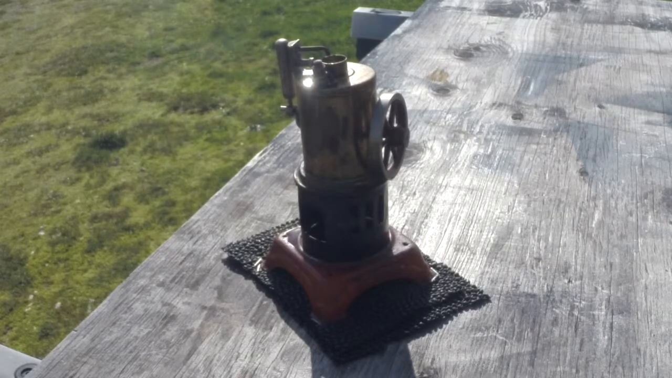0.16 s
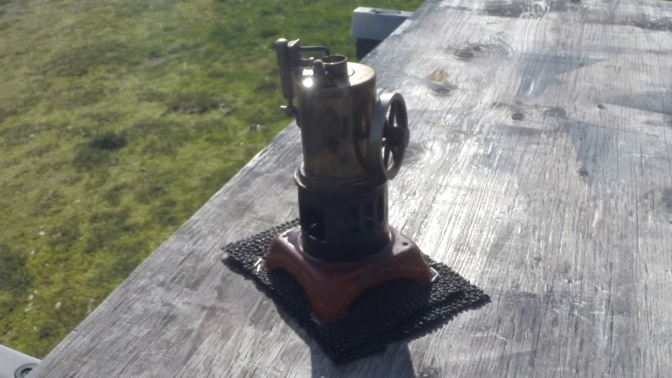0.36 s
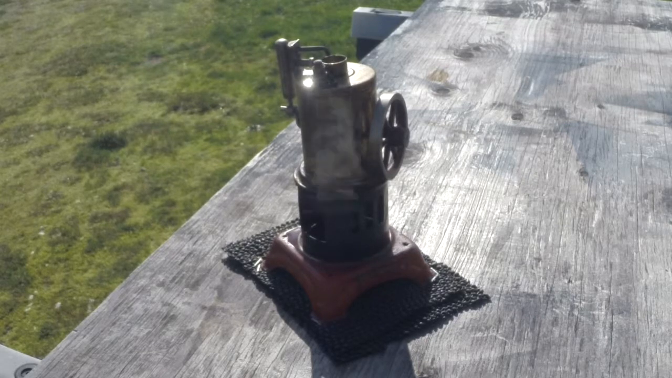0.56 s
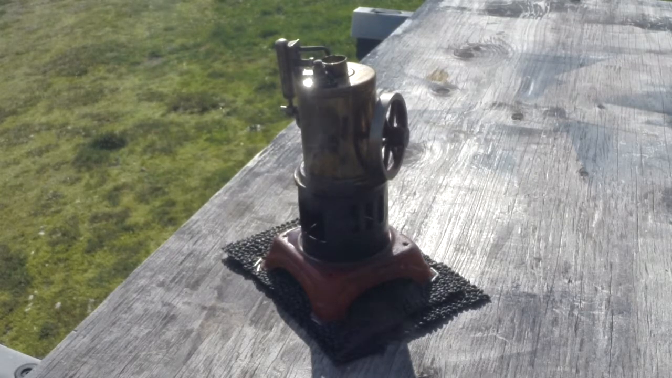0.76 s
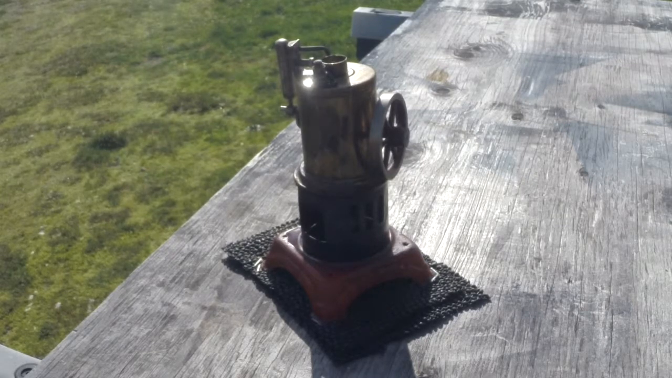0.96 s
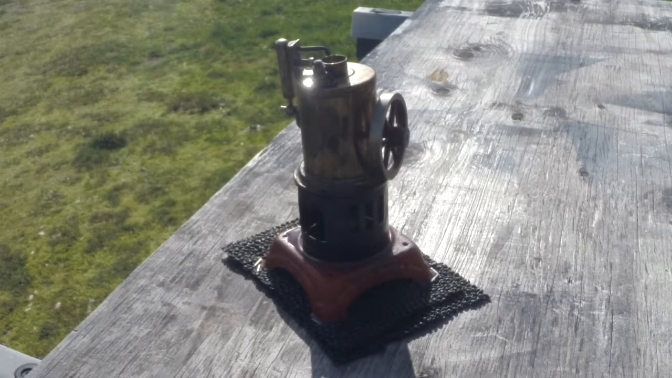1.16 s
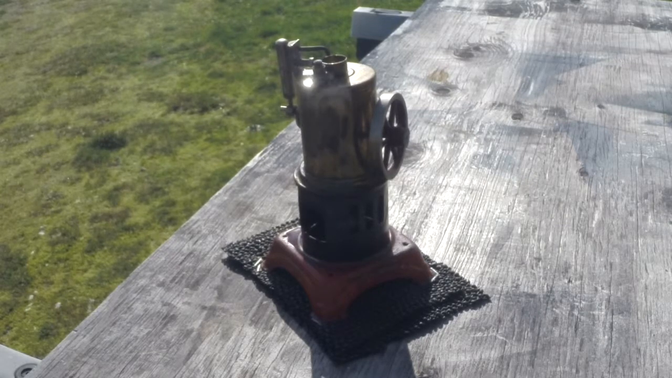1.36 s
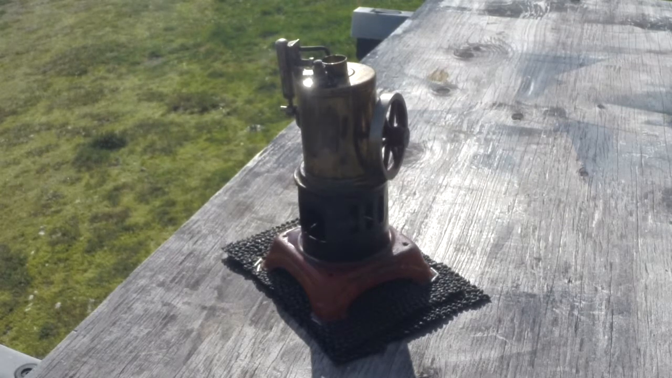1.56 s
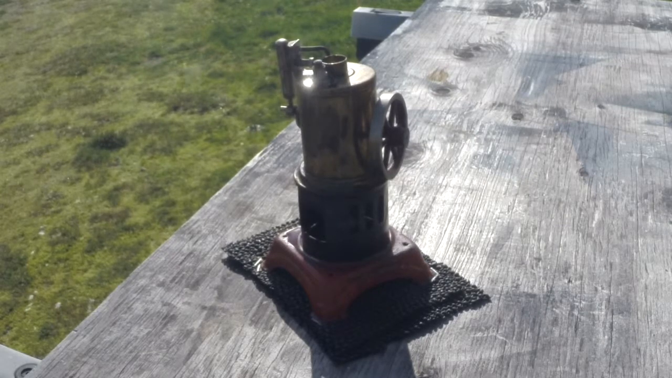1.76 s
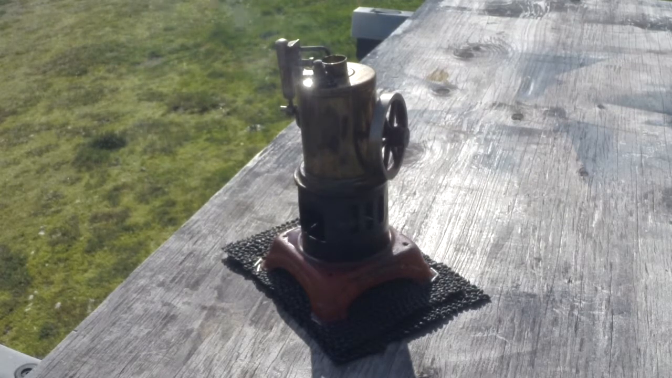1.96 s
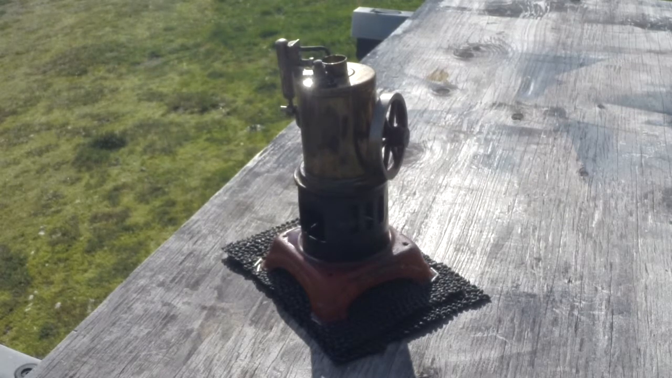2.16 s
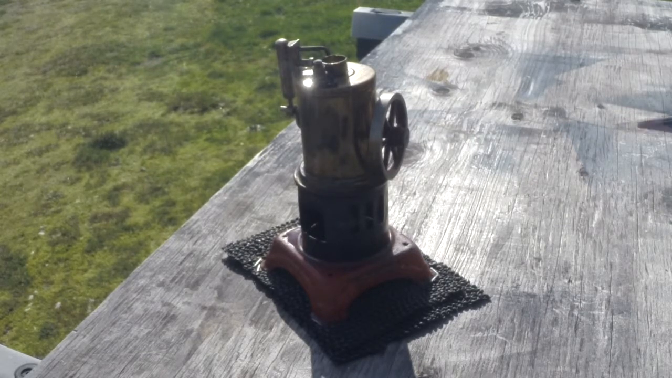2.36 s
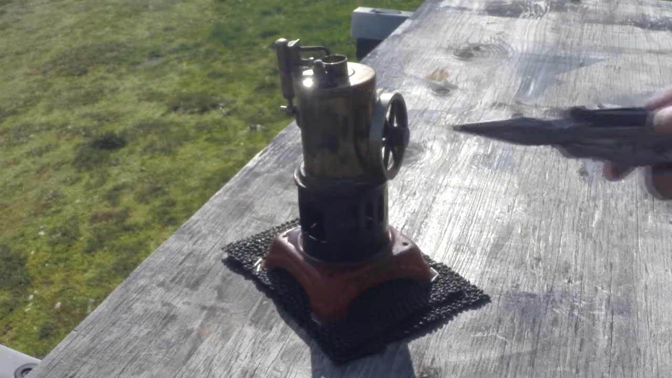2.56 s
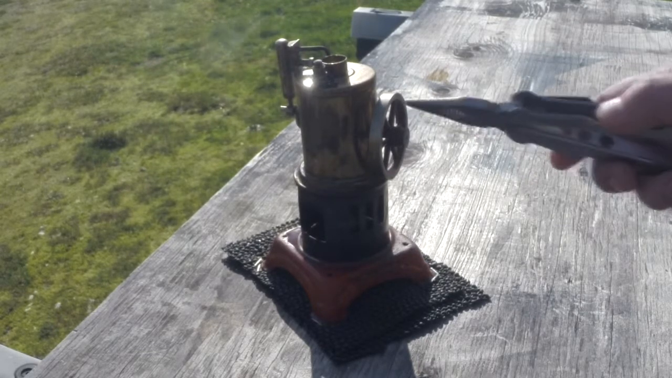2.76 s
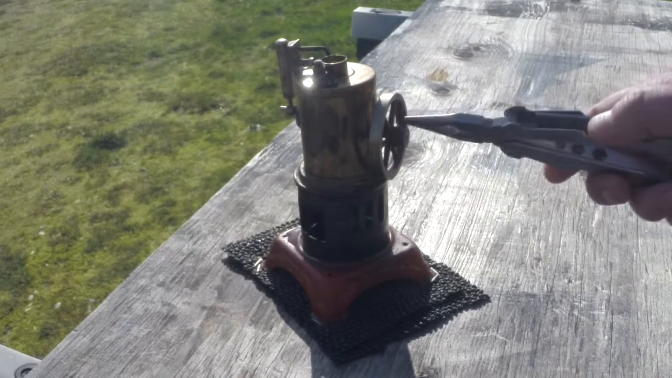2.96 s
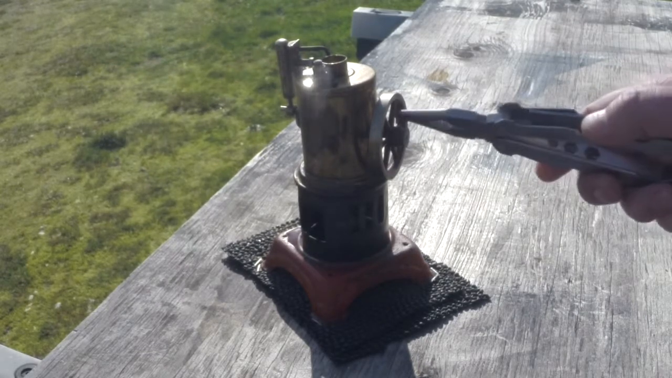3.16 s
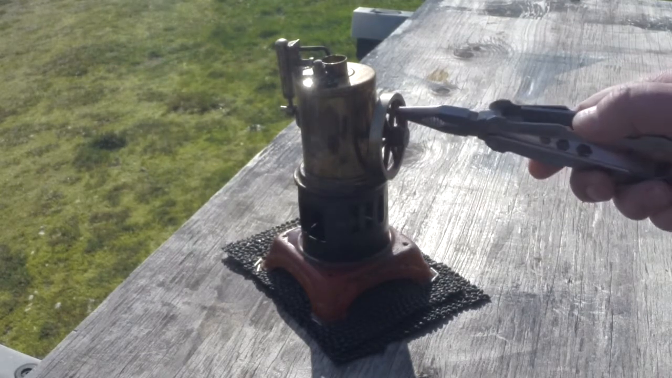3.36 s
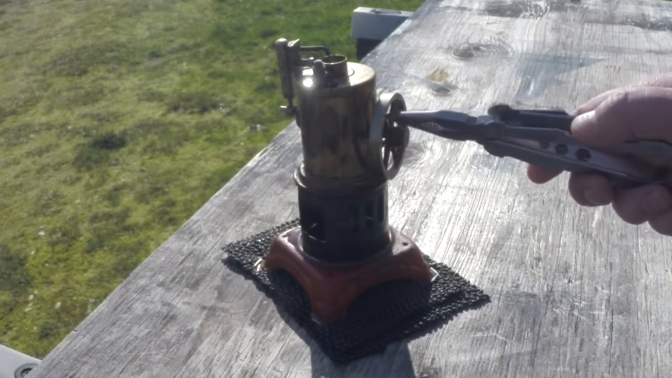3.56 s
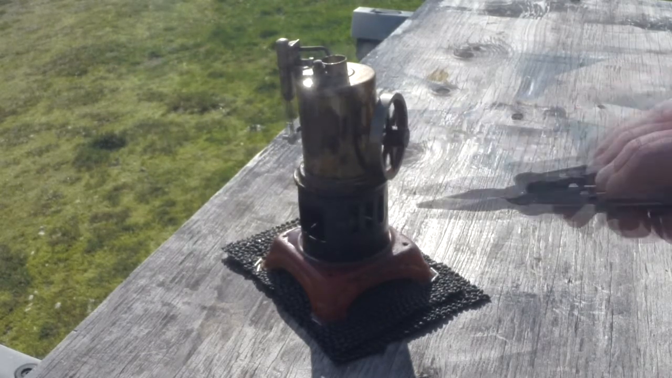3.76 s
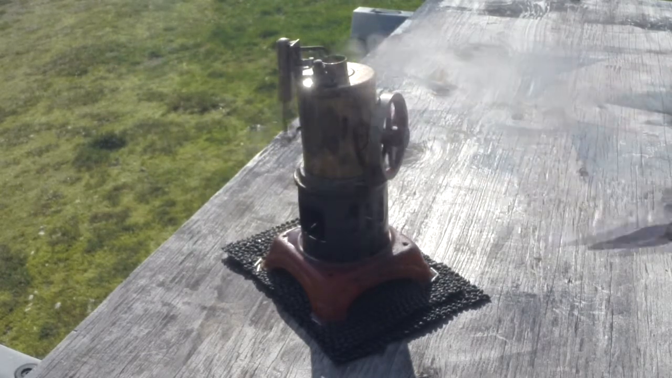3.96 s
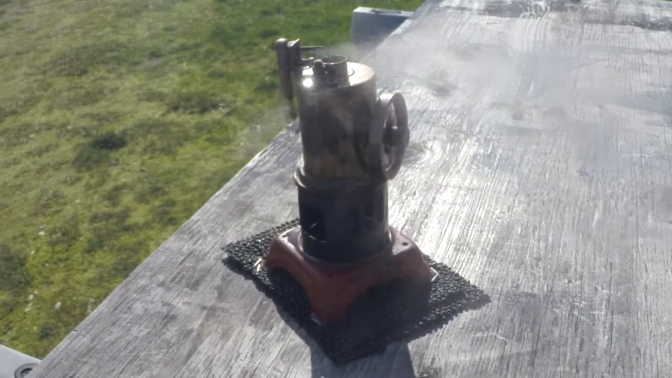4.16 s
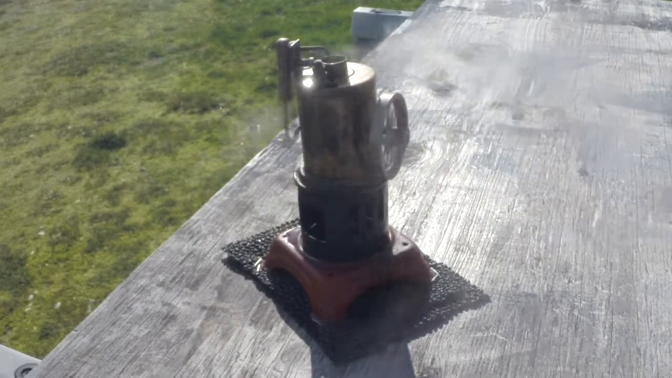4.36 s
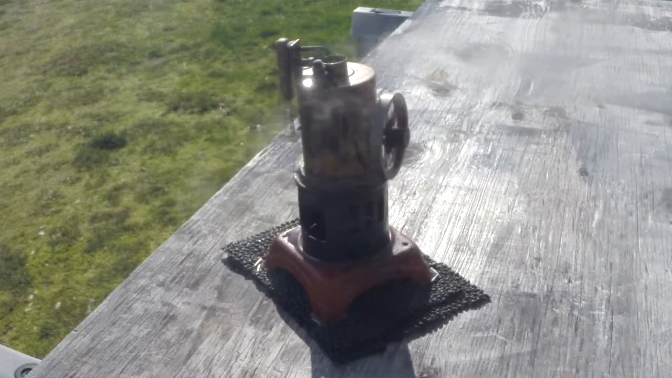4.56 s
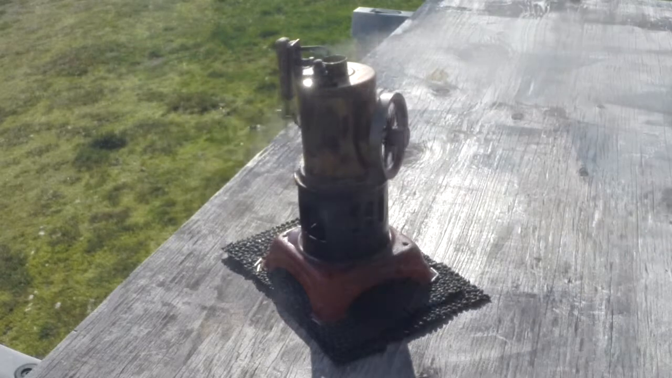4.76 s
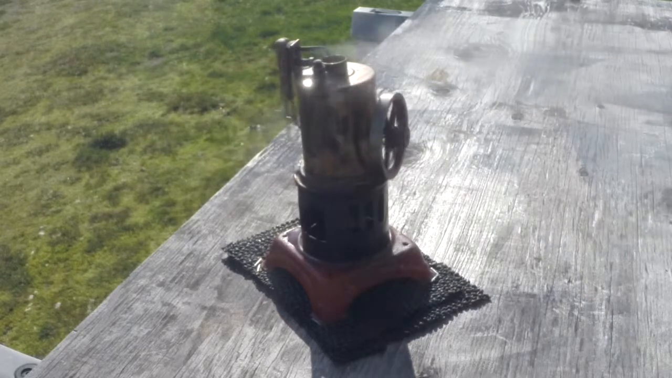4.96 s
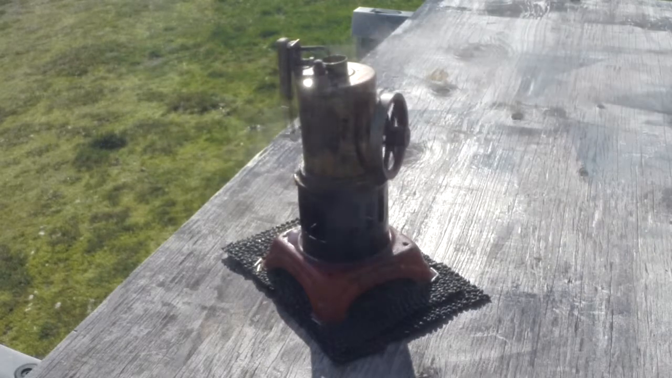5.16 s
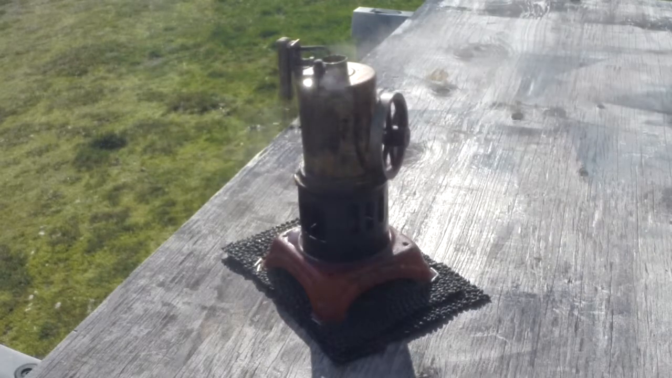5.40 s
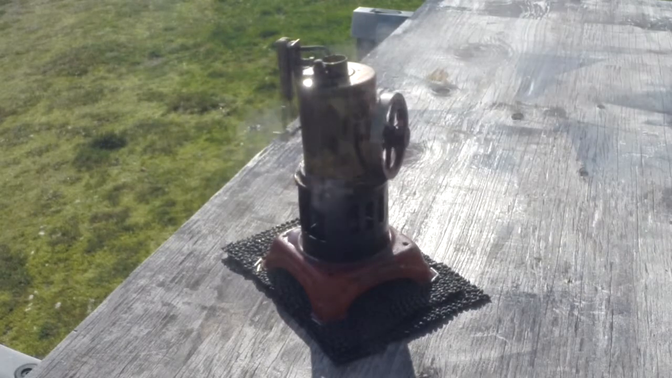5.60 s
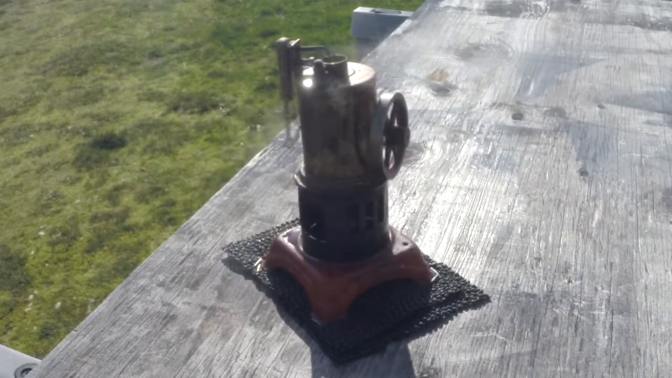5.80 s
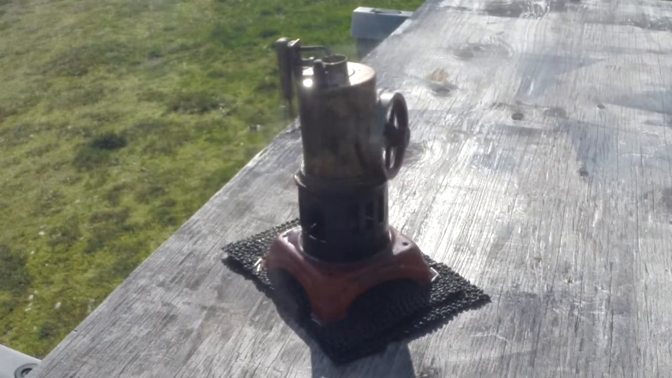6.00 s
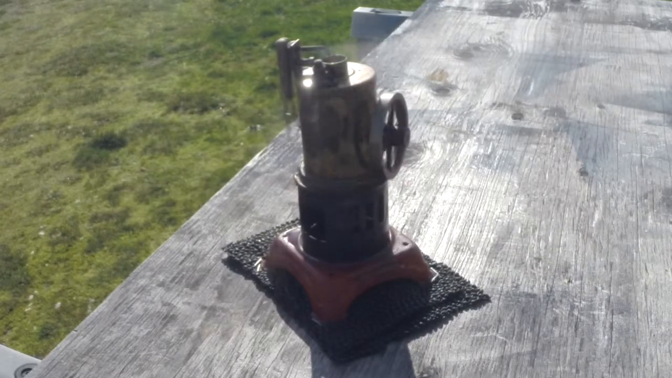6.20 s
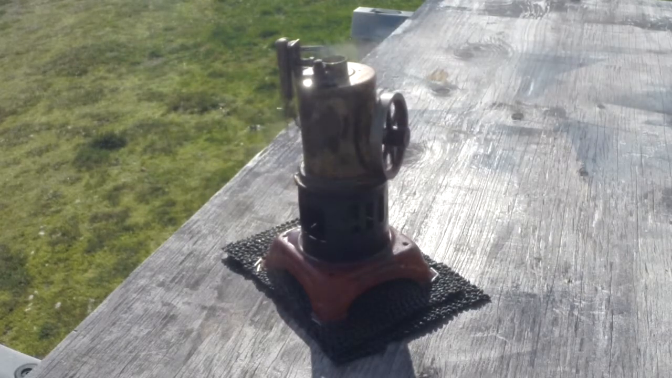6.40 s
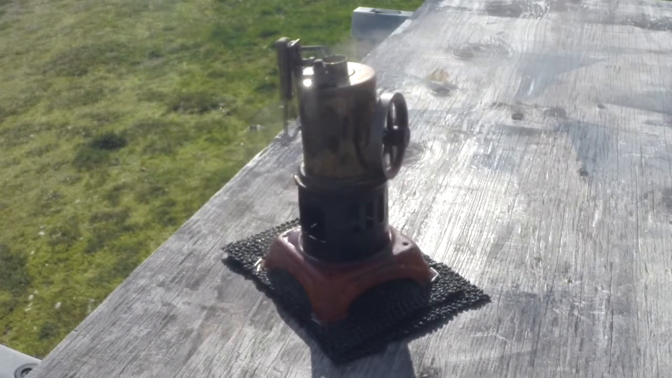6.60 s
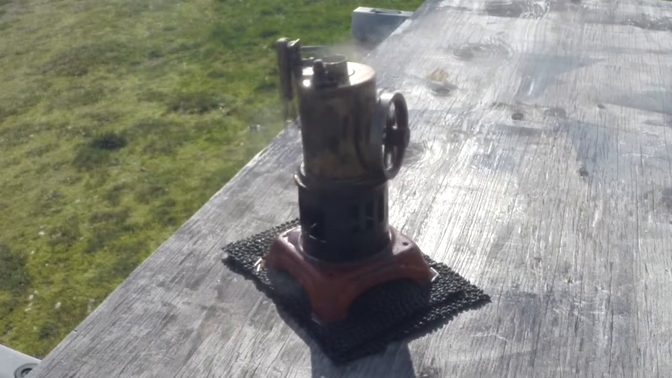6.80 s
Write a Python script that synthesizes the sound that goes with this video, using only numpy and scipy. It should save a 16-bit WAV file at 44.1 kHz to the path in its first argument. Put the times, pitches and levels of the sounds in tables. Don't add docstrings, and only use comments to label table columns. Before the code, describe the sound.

Quiet boiler hiss, droplet ticks and bubbling pops give way to metallic clacks and fast accelerating steam puffs from a toy engine on a table.

```python
import sys
import numpy as np
from scipy import signal
from scipy.fft import rfft, irfft
from scipy.io import wavfile

SR = 44100
rng = np.random.default_rng(int(sys.argv[2]) if len(sys.argv) > 2 else 0)


def level_to_linear(level):
    exponent = np.asarray(level, float) / 20
    return 10 ** exponent


def dump(signal):
    limited = np.clip(np.atleast_2d(signal).T, -1, 1)
    pcm = np.round(limited * 32767).astype(np.int16)
    wavfile.write(sys.argv[1], SR, pcm)


N = 301644
t = np.arange(N) / SR


def in_time(rows):
    s, *columns = np.transpose(rows)
    return [np.interp(t, s, c) for c in columns]


def at_hz(points):
    hz, value = np.transpose(points)
    return np.interp(np.log(np.fft.rfftfreq(N, 1 / SR) + 1), np.log(hz), value)


def colour(x, points):
    gain = level_to_linear(at_hz(points))
    return irfft(rfft(x) * gain / np.sqrt(np.mean(gain ** 2)), N)


def drift(rate):
    r = np.exp(-80 * np.pi * rate / SR)
    slow = signal.lfilter([1], [1, -2 * r, r * r], rng.standard_normal(N // 40 + 2002))[2000:]
    return np.interp(np.arange(N) / 40, np.arange(len(slow)), slow / slow.std())


def band(x, low_hz, high_hz):
    sos = signal.butter(2, [low_hz, min(high_hz, .45 * SR)], "band", fs=SR, output="sos")
    return signal.sosfilt(sos, x) * np.sqrt(SR / 2 / (high_hz - low_hz))


def part(x, order, corner_hz, side="low"):
    return signal.sosfiltfilt(signal.butter(order, corner_hz, side, fs=SR, output="sos"), x)


def resonance(x, hz, width):
    r = np.exp(-np.pi * width / SR)
    poles = [1, -2 * r * np.cos(2 * np.pi * hz / SR), r * r]
    return signal.lfilter([(1 - r * r) / 2, 0, (r * r - 1) / 2], poles, x + 1e-18)


def click(s, db):
    out = np.zeros(N)
    out[int(s * SR)] = level_to_linear(db)
    return out


def bursts(times, db, decay_ms, same=0.):
    out = np.zeros(N + 2000)
    noise = rng.standard_normal((len(times) + 1, 2000))
    same = np.clip(same, 0, 1)
    for s, level_db, ms, row in zip(times, db, np.broadcast_to(decay_ms, len(times)), noise[1:]):
        i = min(int(s * SR), N)
        fall = np.exp(-np.arange(2000) / (SR * max(ms, .1) / 1000))
        blow = (same * noise[0] + np.sqrt(1 - same ** 2) * row) * fall
        out[i:i + 2000] += level_to_linear(level_db) * blow * np.linalg.norm(fall) / np.linalg.norm(blow)
    return out[:N]


def wet_steam(grain_db):
    return rng.standard_normal(N) * level_to_linear(grain_db * drift(250.0) + 1.0 * drift(104.0))


# (frequency [Hz], level [dB per Hz])
FAR_SPECTRUM = [(18, -31), (30, -14.5), (93, 1), (224, -10.5), (309, -7), (409, -14.5), (495, -12),
                (654, -12.5), (846, -9), (1350, -12.5), (2690, -24), (3950, -24), (5000, -25), (6500, -49),
                (11000, -120)]
# (frequency [Hz], likeness [0-1])
EAR_LIKENESS = [(60, 0.88), (180, 0.62), (550, 0.15), (1650, 0.4), (4970, 0.81), (15000, 0.8)]


def surroundings():
    level_db = -67.5 + 0.18 * t
    alike = np.clip(at_hz(EAR_LIKENESS), 0, 1)
    mid, side = rfft(rng.standard_normal((2, N))) * level_to_linear(at_hz(FAR_SPECTRUM))
    pair = irfft(np.sqrt(1 + alike) * mid + np.sqrt(1 - alike) * side * [[1], [-1]], N)
    pair = pair + 1.0 * resonance(pair, 800.0, 33.0) * (t < 2.3)
    return pair / pair.std() * level_to_linear(level_db + 4.5 + 0.96 * drift(3.1))


# (time [s], level [dB])
VALVE_HISS = [(0.0, -62), (.5, -61.5), (1.9, -61.5), (2.2, -62), (2.67, -60), (3.18, -60), (3.22, -57.5),
              (3.41, -54.5), (3.66, -53.5), (3.7, -56.5), (3.84, -54.5)]
# (lower edge [Hz], level [dB])
SEAM_PATCHES = [(2600, -9), (3500, -15), (4600, -2.5), (5800, 2.5), (7200, 0.5), (8900, 0)]


def leak_hiss():
    valve_db, = in_time(VALVE_HISS)
    singing = sum(np.sin(np.pi * film_age(start, end)) for start, end, *_ in VALVE_FILMS)
    seam_db = -70. + (valve_db - valve_db[0]) - 1.5 * singing
    white = rng.standard_normal((2, N))
    seam, valve = np.zeros((2, N))
    for k, (hz, db) in enumerate(SEAM_PATCHES):
        seam += level_to_linear(db + 2.26 * drift(27.0)) * band(white[k % 2], hz, 1.454 * hz)
    for k, hz in enumerate([11000., 12340.0, 13400.0, 14700.0]):
        valve += level_to_linear(2. * drift(12.0)) * band(white[k % 2], hz, 1.12 * hz)
    return seam * level_to_linear(seam_db - 4.5) + valve * level_to_linear(valve_db - 10.0)


# (time [s], peak level [dB], lower part [dB])
SPIT_DROPLETS = [(0.032, -35, -17), (0.088, -35.5, -13), (0.19, -35, -16), (0.4512, -34, -20),
                 (0.517, -44, -6), (0.717, -35, -15), (0.9957, -42, -5), (1.1413, -39, -20),
                 (1.266, -35, -11.5), (1.3159, -38.5, -18), (1.3468, -39, -19), (1.4576, -37.5, -15),
                 (1.5818, -41, -10), (1.6574, -38.5, -7.5), (1.756, -37, -16), (1.8317, -36, -24),
                 (1.8615, -35, -18), (1.917, -32, -19), (2.0088, -37, -23), (2.199, -40, -11),
                 (2.42, -40, -10), (2.761, -35.5, -19), (2.927, -39, -11), (2.992, -37, -13),
                 (3.0646, -38, -13), (3.18, -34, -26), (3.2161, -35, -13), (3.236, -41.5, -3.5),
                 (3.303, -41, -8), (3.34, -47, -12), (3.366, -45, -11), (3.417, -40, -10), (3.51, -40, -12),
                 (3.633, -38, -20), (3.646, -40, -13), (3.68, -42, -20), (3.7337, -37, -19),
                 (3.762, -39, -19), (3.8596, -34, -23)]


def spits():
    s, peak_db, lower_db = np.transpose(SPIT_DROPLETS)
    out = band(bursts(s, peak_db - 8.5, 0.98), 10700.0, 22500.0)
    out += band(bursts(s, peak_db + lower_db - 0.5, 0.95) * (t < 3.2), 2900.0, 12300.0)
    out += band(bursts(s, peak_db + lower_db + 0.5, 1.5) * (t > 3.2), 6800.0, 11700.0)
    crackle = (rng.random(N) < 90. / SR) * level_to_linear(3 * np.minimum(rng.exponential(1, N), 3))
    crackle = crackle * rng.choice([-1, 1], N)
    out += level_to_linear(-59) * band(crackle, 900., 2600.)
    return out + level_to_linear(-49) * band(np.roll(crackle, N // 3), 4000., 15000.)


# (time [s], length [s], low edge [Hz], high edge [Hz], level [dB])
LEAK_SPUTTERS = [(0.079, 0.037, 4500, 9000, -67.5), (0.203, 0.068, 4970, 8500, -72),
                 (0.992, 0.016, 4000, 15000, -65.5), (1.454, 0.025, 5000, 15500, -67),
                 (0.585, 0.1, 900, 2010, -72), (3.447, 0.11, 1400, 2600, -79),
                 (1.836, 0.11, 900, 2180, -78), (1.937, 0.042, 4500, 9100, -70.5),
                 (2.277, 0.13, 900, 2200, -76.5), (2.424, 0.033, 3950, 15500, -64.5),
                 (2.987, 0.036, 5000, 15000, -71), (3.218, 0.087, 5200, 8850, -66.5),
                 (3.313, 0.17, 5200, 9500, -66.5), (3.5, 0.084, 5230, 6500, -72),
                 (3.603, 0.057, 5100, 6900, -66.5), (3.915, 0.016, 2030, 16000, -53.5)]


def sputters():
    out = np.zeros(N)
    wet = wet_steam(3.5) * level_to_linear(1.5 * drift(23.0))
    for start, length, low_hz, high_hz, db in LEAK_SPUTTERS:
        span = slice(int(start * SR), int((start + length) * SR))
        gust = level_to_linear(5.5) * wet[span] / wet[span].std()
        gust = band(band(gust, low_hz, high_hz), low_hz, high_hz) * np.sqrt((high_hz - low_hz) / SR * 2)
        out[span] += level_to_linear(db) * signal.windows.tukey(span.stop - span.start, .15) * gust
    return out


# (time [s], peak level [dB], pitch [Hz])
BUBBLES = [(0.0882, -52, 1330), (0.5661, -58, 1100), (0.6539, -55, 1100), (0.6843, -54, 1420),
           (0.7173, -53, 1150), (0.7342, -50, 1110), (0.9597, -57, 1680), (0.9757, -51, 1730),
           (0.9996, -58, 1390), (1.0281, -51, 1460), (1.1278, -59, 1420), (1.3004, -48.5, 1500),
           (1.3379, -58, 1130), (1.6571, -60, 1250), (1.8427, -51, 1290), (1.8582, -53, 1710),
           (1.8811, -59, 1350), (1.9205, -58, 1430), (1.9415, -52, 1670), (2.0981, -57, 1390),
           (2.1286, -61.5, 1440), (2.2732, -58, 1420), (2.2922, -53, 1590), (2.3077, -56, 1310),
           (2.3271, -56, 1100), (2.3725, -55, 1380), (2.3955, -54, 1880), (2.5142, -59, 1320),
           (2.9372, -50, 1350), (3.0016, -56, 1880), (3.019, -58, 1450), (3.042, -56, 1860),
           (3.455, -53, 1330), (3.5054, -53, 2010), (3.6411, -55, 1570), (3.6651, -53, 1430),
           (3.7638, -50, 1260)]


def pops():
    out, age = np.zeros(N + 400), np.arange(400) / SR
    for s, db, hz in BUBBLES:
        ring = np.sin(2 * np.pi * hz * age) * np.exp(-np.pi * 720 * age)
        out[int(s * SR):int(s * SR) + 400] += level_to_linear(db + 10) * ring * np.minimum(age * hz * 2, 1)
    return out[:N]


def film_age(start, end):
    return np.clip((t - start) / (end - start), 0, 1)


# (start [s], end [s], from [Hz], to [Hz], level [dB])
VALVE_FILMS = [(0.143, 0.45, 12100, 15000, -65), (1.08, 1.248, 12600, 15100, -66),
               (1.997, 2.38, 11000, 15200, -64), (2.675, 3.052, 11000, 15400, -66),
               (3.25, 3.59, 11900, 14900, -75)]


def valve_films():
    out = np.zeros(N)
    narrow = band(rng.standard_normal(N), 30., 600.)
    for start, end, from_hz, to_hz, db in VALVE_FILMS:
        gone = film_age(start, end)
        carrier = np.cos(2 * np.pi * np.cumsum(from_hz + (to_hz - from_hz) * gone) / SR)
        out += level_to_linear(db) * np.sqrt(np.sin(np.pi * gone) + 1e-9) * narrow * carrier
    return out


# (time [s], peak level [dB])
BASE_TICK = [
    (0.734, -36),
]


def base_tick():
    (s, db), = BASE_TICK
    tick = band(band(click(s + 0.00085, db - 2), 800.0, 6200.0), 500., 6400.)
    knock = resonance(click(s + 0.00188, db + 24), 420.0, 250.0)
    return tick + knock - band(click(s + 0.00123, db - 16), 120., 1200.)


def boiler():
    return leak_hiss() + spits() + sputters() + pops() + valve_films() + base_tick()


FULL_SPEED = 19.
LAST_STRETCH_S = 6.3
# (time [s], speed [turns per s])
FLYWHEEL_SPEED = [(3.95, 7.332), (4.3, 11.473), (4.6, 14.673), (4.85, 17.277), (5.1, 18.442),
                  (5.35, 19.209), (5.7, 20.37), (6.0, 20.784), (6.5, 21.097), (6.84, 21.725)]
# (time [s], face leak [dB], exhaust puff [dB], piston knock [dB], rattle [dB])
RUNNING_LEVELS = [(3.9, -57, -32, -37, -38), (3.97, -50.5, -32.5, -44, -38), (4.17, -48, -31.5, -38, -35),
                  (4.62, -41, -33, -35, -37), (4.9, -38, -32.5, -28.5, -49), (5.03, -37.5, -36, -30.5, -51),
                  (5.13, -36, -34.5, -32.5, -36), (5.26, -36, -37, -24.5, -47),
                  (5.48, -37, -34, -25.5, -52), (5.7, -35.5, -37.5, -27.5, -41),
                  (6.33, -35, -36.5, -28.5, -31), (6.42, -36, -34.5, -28, -22),
                  (6.71, -32.5, -30.5, -27.5, -36), (6.84, -37, -29.5, -25.5, -33)]
TURN_SCATTER = [1.1, 1.5, 1.1, 0.5, 1.5]
# (turn [count], 1 puff or 3 rattle, change [dB])
WATER_SLUGS = [(1, 1, -4), (2, 1, 0.5), (41, 1, 3.5), (43, 1, 0), (45, 1, 2), (47, 1, -0.5), (49, 1, -2),
               (46, 3, 6), (48, 3, 11.5)]


def crank():
    speed, = in_time(FLYWHEEL_SPEED)
    angle = np.cumsum(speed) / SR
    angle = angle - np.interp(3.99836, t, angle)
    opens = np.interp(np.arange(int(angle[-1]) + 1), angle, t)
    _, puff_db, knock_db, rattle_db = [np.interp(opens, t, c) for c in in_time(RUNNING_LEVELS)]
    swing_db = knock_db + 26.5
    tick_db, slap_db = -30 + 0.57 * swing_db, -28 + 1.3 * swing_db
    levels = np.c_[puff_db, tick_db, rattle_db, knock_db, slap_db]
    rows = np.c_[opens, levels + rng.standard_normal((len(opens), 5)) * TURN_SCATTER]
    for turn, column, db in WATER_SLUGS:
        rows[round(turn), round(column)] += db
    return speed, angle, rows


def turn_lengths(rows):
    return np.diff(rows[:, 0], append=2 * rows[-1, 0] - rows[-2, 0])


def contact_times(rows, where, slack=0.):
    late = 0.058 * np.maximum(rows[:, 0] - LAST_STRETCH_S, 0)
    return rows[:, 0] + turn_lengths(rows) * (where + late * (where > .48) + slack)


def hardness_db(speed):
    return -4.5 + 1.5 * (speed - FULL_SPEED)


# (time [s], peak level [dB], dull part [dB], decay [ms])
ODD_CLACKS = [(3.858, -35, -2, 1.3), (3.893, -41, -4, 2.5), (3.963, -29.5, -14, 2.2),
              (3.9696, -24.5, -19.5, 5.2), (4.0398, -23.5, -13, 2.2), (4.048, -22, -21, 1.9),
              (4.053, -16, -24, 2), (4.0837, -23, -31, 1.8), (4.09, -26.5, -10.5, 5.9),
              (4.15, -22, -15, 3.8), (4.1628, -24, -32, 8), (4.191, -30, -10, 6.6), (4.2485, -25, -26, 3.5),
              (4.413, -21, -20, 7.2), (4.491, -27, -19, 4), (4.2594, -36, -21, 2.5),
              (4.2837, -34.5, -11, 1.5), (4.333, -25.5, -9, 4), (4.3683, -25, -11, 4),
              (6.6286, -7, -33, 2.8), (6.631, -21, -15, 2), (6.677, -16, -17, 3), (6.721, -32, -20, 2),
              (6.722, -7.5, -42, 1.8), (6.768, -36, -29, 2.5), (6.816, -11, -37, 1.9)]


def odd_clacks():
    s, peak_db, dull_db, ms = np.transpose(ODD_CLACKS)
    bright = band(bursts(s, peak_db - 13.5, ms), 2900.0, 15400.0)
    return bright + band(bursts(s, peak_db + dull_db - 11, 1.6 * ms), 420.0, 1300.0)


# (frequency [Hz], width [Hz], level [dB])
BRASS_MODES = [(1460, 150, -8), (3050, 200, -14), (4780, 220, -4), (5640, 120, -15), (6000, 125, -5),
               (6960, 120, -8), (7550, 140, -8), (8280, 300, -8), (11600, 370, -8), (12300, 360, -10)]


def brass(x):
    return sum(level_to_linear(level_db + 8.5) * resonance(x, hz, width) for hz, width, level_db in BRASS_MODES)


# (frequency [Hz], width [Hz])
COLD_MODES = [(4900, 500), (5600, 49), (6700, 69)]


def cold_cylinder(x):
    return level_to_linear(2.5) * sum(resonance(x, hz, width) for hz, width in COLD_MODES)


# (place [0-1], level [dB])
FACE_LEAK = [(0, -1), (.2, -6.5), (.35, -4), (.6, -2), (.8, -4), (.88, -11.5), (.96, -10.5), (1, 6)]
# (frequency [Hz], level [dB per Hz])
LEAK_SPECTRUM = [(300, -6), (800, 2.5), (1400, 3), (2000, 0), (3800, 2), (5000, 0.5), (7000, -4),
                 (9500, -3), (13000, 3.5), (16000, 0.5)]


def face_leak(speed, angle):
    leak_db = in_time(RUNNING_LEVELS)[0] + np.interp(angle % 1, *np.transpose(FACE_LEAK)) + 2.5
    leak = colour((t > 3.93) * level_to_linear(leak_db) * wet_steam(1.36), LEAK_SPECTRUM)
    return leak + (level_to_linear(hardness_db(speed)) - 1) * part(leak, 4, 9000., "high")


# (place [0-1], level [dB])
PORT_OPENING = [(0, -38), (.015, -15), (.07, 3), (.15, -1.5), (.21, -6), (.29, -15.5), (.4, -45), (1, -55)]
# (frequency [Hz], level [dB per Hz])
PUFF_SPECTRUM = [(200, -13), (800, -13), (1400, 1.5), (2000, -7), (3500, 3), (5000, 2.5), (7000, 4),
                 (9500, -0.5), (13000, 2.5), (16000, 0.5)]


def exhaust_puffs(angle, rows, wet):
    turn = np.clip(angle, 0, None).astype(int)
    slow = (turn_lengths(rows)[turn] / 0.072) ** 0.65
    lead = 0.018 + 0.068 * np.maximum(t - LAST_STRETCH_S, 0)
    early = np.minimum(angle + lead, len(rows) - 1e-6)
    place = early % 1
    port_db = np.interp(place * slow, *np.transpose(PORT_OPENING))
    port_db = port_db + 0.44 * wet * np.clip(-port_db, 0, 8.) * (place < .5)
    port_db = port_db - 5 * wet * np.clip(1 - place * slow / 0.087, 0, 1)
    turn_db = rows[np.clip(early, 0, None).astype(int), 1]
    puff = colour((early > 0) * level_to_linear(turn_db + port_db + 2.5) * wet_steam(2.2), PUFF_SPECTRUM)
    return puff + (level_to_linear(3.5 * wet) - 1) * part(puff, 3, 4200.)


# (place [0-1], level [dB])
SHELL_BREATH = [(0, 2), (.12, -0.5), (.19, 1.5), (.25, -9), (.31, -1.5), (.4, 3), (.46, -3), (.52, 0.5),
                (.58, -14), (.64, -4.5), (.7, -3.5), (.76, 0), (1, -2)]


def steam_in_shell(puff, leak, angle, wet):
    out = puff + leak + 0.81 * resonance(leak, 4940.0, 210.0) + 0.73 * resonance(leak, 1110.0, 230.0)
    breath_db = np.interp(angle % 1, *np.transpose(SHELL_BREATH)) * np.clip(1 - wet * 1.4, 0, 1)
    return out + (level_to_linear(breath_db) - 1) * part(out, 3, 2300.)


# (multiple of the turn rate, level [dB])
SHAKE_MULTIPLES = [(1, -27), (2, 0), (3, -12), (4, -6), (5, -8), (6, -25), (7, -4), (8, -7.5), (9, -13),
                   (10, -23), (11, -7), (12, -8.5), (13, -10), (14, -9), (15, -9), (16, -8), (17, -24),
                   (18, -2.5), (19, -27.5), (20, -16), (21, -20), (22, -4), (23, -7), (24, -5.5), (25, -29),
                   (26, -9), (27, -15), (28, -4), (29, -26), (30, -13.5), (31, -3), (32, -11.5)]
# (frequency [Hz], width [Hz], lift [dB])
TABLE_LIFTS = [(76.6, 20, 0), (140.6, 13, 7), (293, 31, 6.5), (356, 31, 2), (402, 48, -8), (504, 23, 2),
               (620, 43, 4)]


def table_shake(speed, angle):
    hum_db = -62 + 20 * 0.96 * np.log10(speed / FULL_SPEED)
    tuned = 2 * speed / 38.7
    bounce_db = -10 * np.log10((1 - tuned ** 2) ** 2 + (tuned / 8) ** 2)
    shake_db = -74 + 20 * 3. * np.log10(tuned) + bounce_db
    out = np.zeros(N)
    phases = rng.uniform(0, 2 * np.pi, len(SHAKE_MULTIPLES))
    for (multiple, level_db), phase in zip(SHAKE_MULTIPLES, phases):
        if round(multiple) == 2:
            loud_db = shake_db + 1.5
        else:
            lift_db = sum(db / (1 + (2 * (multiple * speed - hz) / width) ** 2)
                          for hz, width, db in TABLE_LIFTS)
            loud_db = hum_db - 0.5 + level_db + lift_db
        tone = np.sin(2 * np.pi * round(multiple) * angle + phase)
        out += (t > 4) * level_to_linear(loud_db + .9 * drift(3.1)) * tone
    return out


JOINT_BANDS = [150, 500, 1200, 3000, 6000, 12500]
# (column of the turn's row, place [0-1], decay [ms], brass ring [dB], six colours [dB])
JOINT_BLOWS = [
    (2, 0.15, 1.9, -3, -40, -31, -11, 1, -19, 8),
    (3, 0.4, 0.92, -23, -41, -33, -17, 2, -14, -13),
    (4, .525, 3.8, 2.5, -36, -13, -2, -9, -3, -18),
    (4, 0.49, 9, -6.5, -24, -13, -11, -16.5, -3, -7),
    (5, .7, 2.8, -4, -40, -20., -30, -6, -2.5, 0),
    (4, 0.35, 2.2, -8, -40, -35, -47, -18, -1.5, -11),
    (3, 0.34, 1.2, -1, -40, -32, -6, -13, -5, -17),
    (1, 0.086, 1.3, 4, -40, -32, -6, -17, -2, -1),
]


def joint_blows(speed, rows, wet):
    out, into_brass, late_blows = np.zeros((3, N))
    seated_db = np.interp(rows[:, 0], t, hardness_db(speed))
    for column, where, ms, ring_db, *db in JOINT_BLOWS:
        column = round(column)
        when = contact_times(rows, where, .004 * rng.standard_normal(len(rows)))
        hit_db = rows[:, column] + max(db) - 0.5 + seated_db * (column == 2) - 20 * (when < 4.2)
        spectrum = [*zip(JOINT_BANDS, db), (16000, db[-1] - 4)]
        hit = colour(bursts(when, hit_db, ms, same=.85), spectrum)
        out += hit
        into_brass += level_to_linear(ring_db - 9.5 * wet) * hit
        late_blows += hit * (where > .3)
    return out, into_brass, late_blows


# (place [0-1], decay [ms], low edge [Hz], high edge [Hz], level [dB])
BASE_THUMPS = [(0.14, 3.7, 900, 1500, 3), (0.47, 2, 233, 400, -1.5), (.37, 3, 380, 940, 3),
               (0.4, 4.4, 240, 560, -1.5), (0.62, 3.4, 860, 1740, 4.5), (.61, 3.0, 555, 990, 5.5),
               (0.71, 1.5, 570, 1830, 11)]


def base_thumps(speed, rows):
    thump_db = -48.5 - 0.12 * (speed - 15.7) ** 2
    out = np.zeros(N)
    for where, ms, low_hz, high_hz, db in BASE_THUMPS:
        hops = bursts(contact_times(rows, where), 0.26 * rng.standard_normal(len(rows)), ms, same=1.0)
        out += level_to_linear(thump_db + db) * band(hops, low_hz, high_hz)
    return out


# (frequency [Hz], level [dB])
TABLE_REFLECTION = [(170, 1), (210, -4), (260, 0.5), (1500, -0.5), (1750, -2), (2100, 0.4), (3500, -3),
                    (4100, -4), (4500, 0.35), (8500, 0.56), (9200, -2.5), (10500, -0.84)]


def engine():
    speed, angle, rows = crank()
    wet = np.clip((18.7 - speed) / 2.6, 0, 1)
    clack = odd_clacks()
    leak = face_leak(speed, angle)
    puff = exhaust_puffs(angle, rows, wet)
    hits, hit_drive, blows = joint_blows(speed, rows, wet)
    out = clack + steam_in_shell(puff, leak, angle, wet) + hits
    out += brass(level_to_linear(-18.0) * puff + level_to_linear(-15.0) * leak + hit_drive + level_to_linear(-17) * clack)
    out += level_to_linear(12) * resonance(clack * (t > 3.95) * (t < 4.12), 795.0, 40.)
    out += cold_cylinder(wet * (blows + clack))
    out += level_to_linear(4.) * resonance(blows, 4770.0, 137.0) + level_to_linear(-15) * resonance(blows, 5200.0, 120.0)
    out += table_shake(speed, angle) + base_thumps(speed, rows)
    out += band(bursts([3.96], [-54.], 25.0), 30.0, 59.0)
    return irfft(rfft(out) * level_to_linear(at_hz(TABLE_REFLECTION)), N)


# (frequency [Hz], level [dB])
NEAR_SPREAD = [(60, -5), (150, -8), (380, -9.5), (950, -12), (2380, -30.5), (5980, -11.5), (15000, -5)]
# (frequency [Hz], level [dB])
LEFT_LEAN = [(60, 0), (240, 0.5), (950, 0), (3770, 0.5), (15000, 1)]


def scene():
    running = engine()
    near = running + boiler()
    mid = rfft(near)
    plume = 1j * level_to_linear(-7) * mid + level_to_linear(-6.5) * rfft(near * drift(145.0))
    side = plume * level_to_linear(at_hz(NEAR_SPREAD)) + 0.028 * rfft(running)
    lean = level_to_linear(at_hz(LEFT_LEAN) * [[.5], [-.5]])
    return irfft((mid + side * [[1], [-1]]) * lean, N) + surroundings()


def roll_off(x):
    return signal.sosfilt(signal.butter(12, 16640, fs=SR, output="sos"), x)


def record(dry):
    x = signal.sosfilt(signal.butter(2, 28., "high", fs=SR, output="sos"), dry)
    x = signal.sosfilt(signal.cheby2(20, 60, 16050, fs=SR, output="sos"), x)
    return roll_off(x)


dry = scene()
out = record(dry)
dump(out)
```